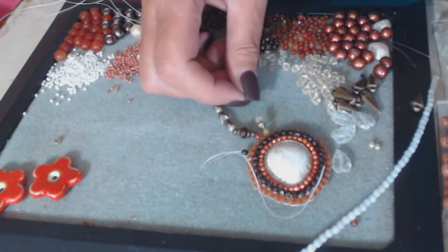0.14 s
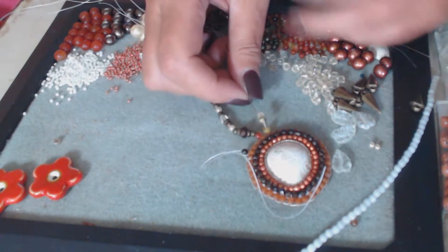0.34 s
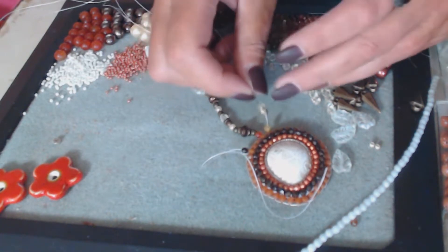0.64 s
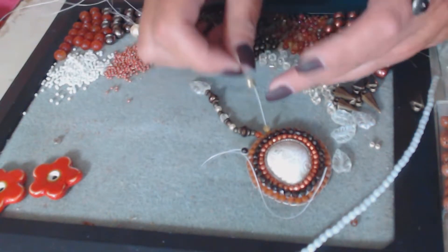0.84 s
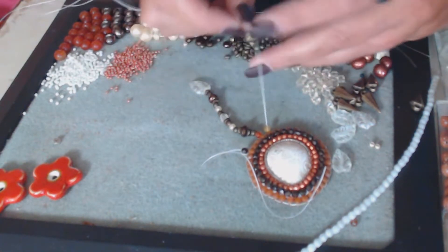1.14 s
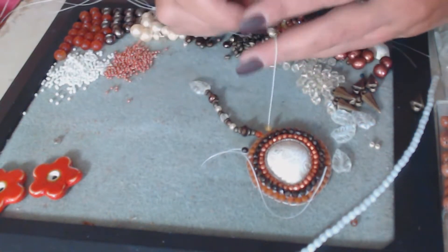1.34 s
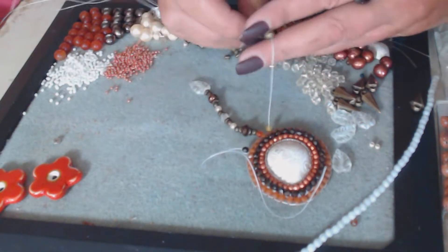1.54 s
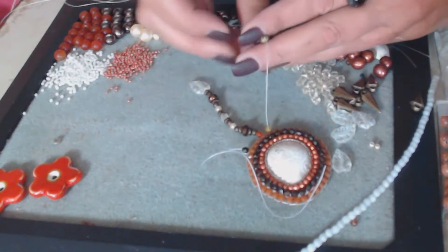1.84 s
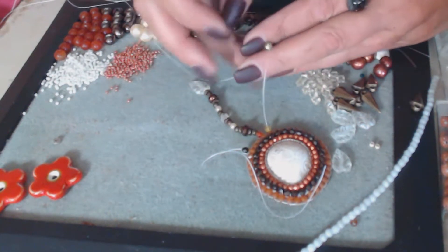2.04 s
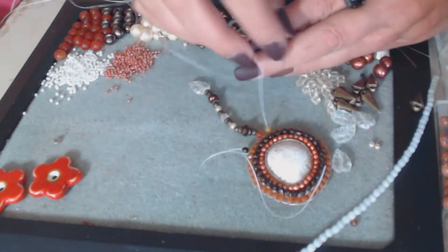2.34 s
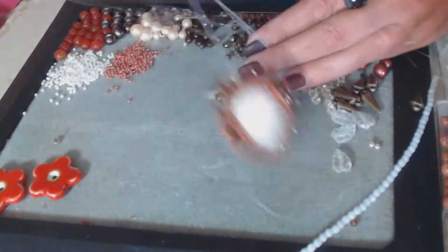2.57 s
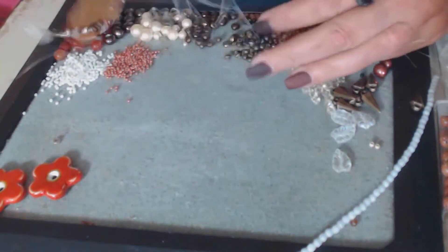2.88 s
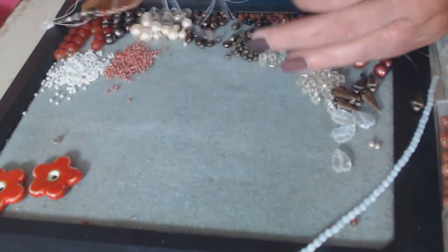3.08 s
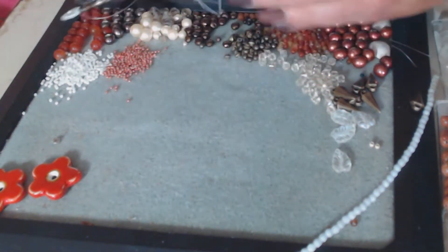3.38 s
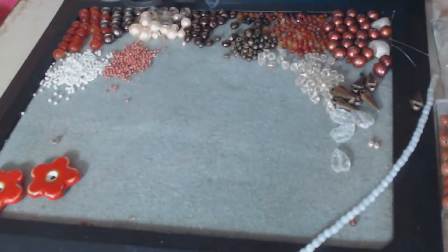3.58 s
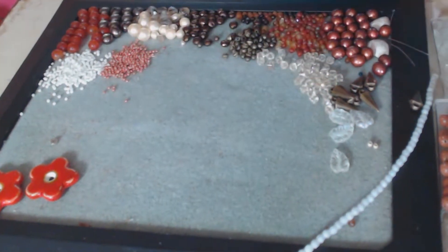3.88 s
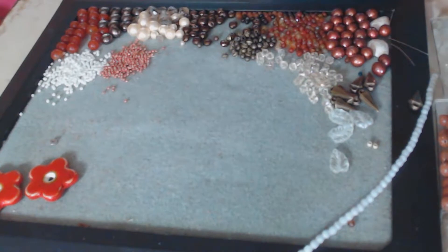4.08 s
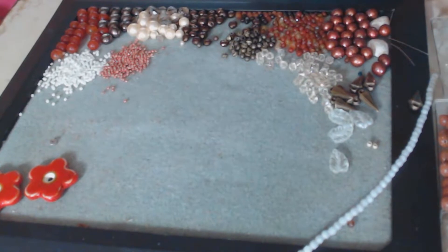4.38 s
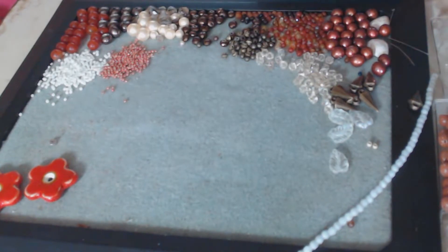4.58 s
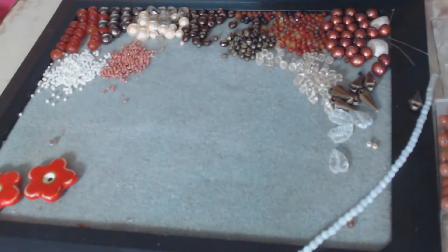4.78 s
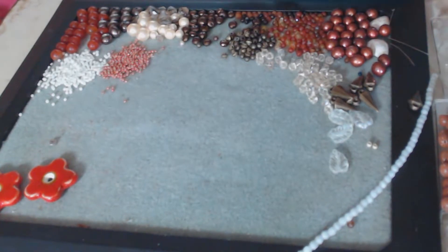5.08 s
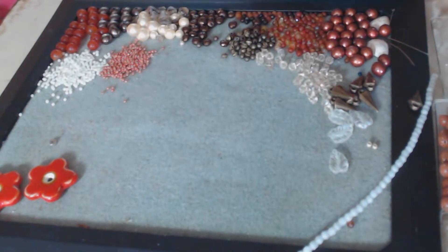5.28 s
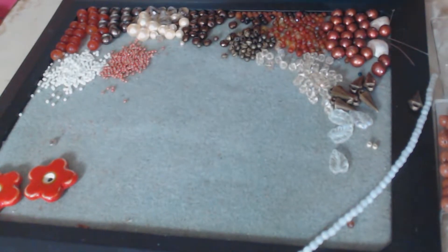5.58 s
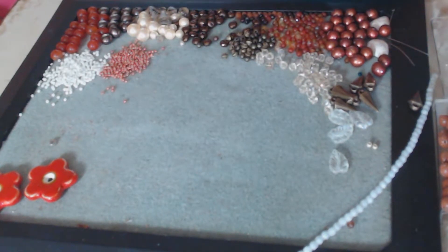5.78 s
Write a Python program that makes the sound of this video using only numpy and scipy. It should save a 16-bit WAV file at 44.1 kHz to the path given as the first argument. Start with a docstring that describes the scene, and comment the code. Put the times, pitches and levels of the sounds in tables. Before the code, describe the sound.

Soft dull thuds over faint fan noise; around three seconds beads tick, knock and scrape for under a second, then near silence again.

```python
"""A quiet room: a beaded pendant on its thread is lifted off a lined tray and handled just beside it.
Beads tick, clatter and knock on the hard tray: chattering noise bursts with rebounds, filtered by colour.
In between they scrape along it: random slips, each a brief decaying note. Struck modes ring on.
Behind them: fan noise with hum lines, soft low bumps and a faint pulsing electronic whine."""
import sys
import numpy as np
from scipy import signal
from scipy.fft import rfft, irfft
from scipy.io import wavfile
from scipy.ndimage import uniform_filter1d, minimum_filter1d

SR = 44100
rng = np.random.default_rng(int(sys.argv[2]) if len(sys.argv) > 2 else 0)


def wrap_up_sound(samples):
    """Save the sound to the file named by the first command line argument, as 16-bit audio."""
    columns = np.atleast_2d(samples).T
    # keep every value between -1 and 1, then stretch to whole-number steps
    tamed = np.clip(columns, -1, 1)
    steps = np.round(tamed * 32767).astype(np.int16)
    wavfile.write(sys.argv[1], SR, steps)


N = 261072
HZ = np.fft.rfftfreq(N, 1 / SR)
TIME = np.arange(N) / SR


def amp(db):
    """Decibels to gain."""
    return 10 ** (np.asarray(db) / 20)


def evened(x):
    """Scales to rms 1."""
    return x / np.sqrt(np.mean(x ** 2) + 1e-20)


def read(points, hz):
    """Interpolates a spectrum table on a log-frequency axis."""
    point_hz, value = np.transpose(points)
    return np.interp(np.log(hz + 1), np.log(point_hz + 1), value)


def add(mix, start_s, sound):
    """Mixes a sound in at start_s."""
    part = mix[round(start_s * SR):][:len(sound)]
    part += sound[:len(part)]


def lowpassed_drift(rate_hz):
    """Slow random curve of rms 1: noise low-passed near rate_hz."""
    return evened(irfft(rfft(rng.standard_normal(N)) / (1 + (HZ / rate_hz) ** 4), N))


def placed(x, balance):
    """Shares a sound between left and right, band by band."""
    left = amp(read(balance, HZ))
    gains = 2 * np.array([left, np.ones_like(left)]) / (1 + left)
    return irfft(rfft(x) * gains, N)


def causal(points, size=2048):
    """Minimum-phase impulse response of a struck body with this colour."""
    log_gain = np.log(amp(read(points, abs(np.fft.fftfreq(size, 1 / SR)))))
    return np.fft.ifft(np.exp(np.conj(signal.hilbert(log_gain)))).real


def pitched(colour, factor):
    """The same colour, moved up or down in pitch."""
    return [(hz * factor, db) for hz, db in colour]


# fan and room air, relative density: freq_hz, level_db_per_hz
AIR_SPECTRUM = [(20, -27.5), (60, -22.5), (110, -1), (160, 1), (225, 3), (320, -8.5), (440, -5.5),
                (790, -12.5), (1300, -19), (2200, -24), (3600, -28), (4300, -31.5), (6200, -34),
                (7400, -38)]
# fan housing resonances: freq_hz, width_hz, lift_db
HOUSING_MODES = [(431, 34.2, 6), (597.5, 69.6, 2.5), (868, 44, 9), (954, 71, 3.5)]


def air(level_db=-58, own_db=-10, flutter_db=-0.5, open_db=0.4, band_hz=2080, band_width_hz=110, band_db=-4):
    """Fan noise coloured by its housing; once the hands are away its hiss opens and a faint band stands out."""
    colour_db = read(AIR_SPECTRUM, HZ)
    for hz, width_hz, lift_db in HOUSING_MODES:
        colour_db = colour_db + lift_db / (1 + (2 * (HZ - hz) / width_hz) ** 2)
    # one noise common to both ears, plus a weaker one of each ear's own
    noise = rng.standard_normal(N) + amp(own_db) * rng.standard_normal((2, N))
    noise = evened(irfft(rfft(noise) * amp(colour_db), N))
    hiss = irfft(rfft(noise) * (1 - 1 / (1 + (HZ / 1800) ** 6)), N)
    band = irfft(rfft(noise) * amp(band_db) * np.exp(-((HZ - band_hz) / band_width_hz) ** 2), N)
    hands_away = np.clip(TIME - 3, 0, 1)
    low = (noise - hiss) * amp(flutter_db * lowpassed_drift(9.2))
    return amp(level_db) * (low + hiss * amp(open_db * hands_away) + band * hands_away)


# mains and motor lines: freq_hz, level_db_rms
HUM_LINES = [(58.2, -69), (120, -73.5), (128.6, -66), (174.4, -61), (240, -71.5), (960, -76.5)]


def hum(waver_rad=.15):
    """Steady sines of the mains and the fan motor, wavering a little in phase."""
    out = np.zeros(N)
    for hz, level_db in HUM_LINES:
        phase = 2 * np.pi * (hz * TIME + rng.random()) + waver_rad * lowpassed_drift(2.2)
        out += amp(level_db) * np.sqrt(2) * np.sin(phase)
    return out


def whine(hz=6810, width_hz=55, level_db=-85.5, sharp=1.5):
    """Thin electronic whine: a wandering narrow-band tone pulsing 24 times a second."""
    pulse = .5 + .5 * np.cos(2 * np.pi * 24 * (TIME - .0185))
    narrow = irfft(rfft(rng.standard_normal(N)) * np.exp(-((HZ - hz) / width_hz) ** 2), N)
    tone = np.cos(np.angle(signal.hilbert(narrow)))  # level flattened, pitch still wanders
    return amp(level_db) * evened(tone * pulse ** sharp)


# clearest soft low bumps: peak_s, level_db, pitch_hz
BUMP_EVENTS = [(0.21, -60.5, 443), (0.526, -52, 240), (0.902, -58, 233), (1.135, -57.5, 458),
               (1.433, -53.5, 236), (2.445, -51, 257), (4.331, -54, 427), (4.962, -53, 382),
               (5.205, -53, 251), (5.52, -51.5, 236)]
# thud colour, also under bead contacts: freq_hz, level_db
THUD_COLOUR = [(40, -31), (120, -19), (200, -2), (330, 4.5), (600, 1), (780, -11.5), (1150, -40.5),
               (3000, -70)]
FAINT_BUMP_DB, FAINT_BUMP_HZ = -60, 240


def bumps(rise_s=.011, murk=0.4, faint_count=8):
    """Soft, dull bumps, some faint at random times: a low tone and thud noise that swell and die."""
    t, out = np.arange(SR // 8) / SR, np.zeros(N)
    swell = t / rise_s * np.exp(1 - t / rise_s)
    faint = [(s, FAINT_BUMP_DB, FAINT_BUMP_HZ) for s in rng.uniform(rise_s, N / SR, faint_count)]
    for peak_s, level_db, hz in [*BUMP_EVENTS, *faint]:
        noise = rng.standard_normal(2 * len(t))
        thud = evened(signal.fftconvolve(noise, causal(THUD_COLOUR))[len(t):2 * len(t)])
        body = evened(np.sin(2 * np.pi * hz * t) + murk * thud)
        add(out, peak_s - rise_s, amp(level_db) * swell * body)
    return out


def squeak(peak_s=4.228, length_s=0.032, hz=2580, width_hz=190, level_db=-66):
    """One faint rubbing squeak: narrow-band noise that swells and fades."""
    rub = evened(irfft(rfft(rng.standard_normal(N)) / (1 + ((HZ - hz) / width_hz) ** 2), N))
    return amp(level_db) * rub * np.exp(-((TIME - peak_s) / length_s) ** 2)


def slips(per_s=1600, spread_db=3.0, cycles=3.5, count=24):
    """Beads catch and slip at random, each with a brief note of its own."""
    t, out = np.arange(1024) / SR, np.zeros(N)
    size = amp(spread_db * np.minimum(rng.exponential(1, N), 3)) * rng.choice([-1, 1], N)
    train = size * (rng.random(N) < per_s / SR)
    bead = rng.integers(0, count, N)
    for k, hz in enumerate(np.geomspace(800, 7000, count)):
        note = np.cos(2 * np.pi * hz * t) * np.exp(-t * hz / cycles)
        note *= np.sqrt(hz / 2500) / np.linalg.norm(note)
        note[0] += .5  # snap of the slip itself
        out += signal.oaconvolve(train * (bead == k), note)[:N]
    return out


# colours of tray clack, bead tick (both also in contacts) and light beads sliding: freq_hz, level_db
CLACK_COLOUR = [(150, -54.5), (480, -25.5), (740, -7), (900, 3.5), (1300, 0.5), (1950, 2), (2700, 0),
                (3300, -9.5), (4000, -25), (6000, -50), (12000, -69.5)]
TICK_COLOUR = [(600, -53.5), (1800, -29), (2800, -14.5), (3500, -4), (4000, -6.5), (4650, 2), (5300, 1),
               (5800, -2.5), (6500, -4), (7600, -2.5), (8400, -8)]
SLIDE_COLOUR = [(400, -53), (1150, -26.5), (1600, -6.5), (2150, -2), (2600, -2), (3050, -9), (3800, -16),
                (5000, -24), (9000, -56.5)]
# short drags, levels before trim_db: start_s, length_s, scrape_db, rattle_db, light_bead_share_0_to_1
DRAG_STROKES = [(2.792, 0.05, -76, -58.5, .5), (3.015, .18, -27, -35, 0.25),
                (3.159, 0.072, -34.5, -47, 0.2), (3.222, 0.098, -41, -55, 0.24),
                (3.431, .12, -50.5, -40, .2), (3.467, .015, -40, -15.5, 0), (3.553, 0.13, -51, -63.5, 0.3),
                (3.682, 0.087, -43.5, -47, 0.4), (3.743, 0.099, -41, -49, 0.84),
                (4.11, 0.04, -83, -71.5, .5), (5.132, 0.045, -75, -63, 0.52)]
STROKE_SKEW, STROKE_POWER = .7, 1.8  # speeds up quickly, slows down gently


def drag(trim_db=-2):
    """Each stroke swells and fades; its slips sound through the tray and the beads themselves."""
    grains, out = slips(), np.zeros(N)
    heavy, small, rattle = (evened(signal.oaconvolve(grains, causal(colour))[:N])
                            for colour in (CLACK_COLOUR, SLIDE_COLOUR, TICK_COLOUR))
    for start_s, length_s, scrape_db, rattle_db, light in DRAG_STROKES:
        now = (TIME >= start_s) & (TIME < start_s + length_s)
        progress = (TIME[now] - start_s) / length_s
        speed = abs(np.sin(np.pi * progress ** STROKE_SKEW)) ** STROKE_POWER
        scrape = np.sqrt(1 - light) * heavy[now] + np.sqrt(light) * small[now]
        out[now] += speed * (amp(scrape_db) * scrape + amp(rattle_db) * rattle[now])
    return amp(trim_db) * out


def chatter(die_s, size=2048):
    """A burst of micro-bounces, partly evened in colour, that dies away."""
    fade = np.exp(-np.arange(size) / SR / die_s)
    burst = rng.standard_normal(size) * fade
    # the shorter the contact, the nearer to one clean pulse
    burst[0] += 4 * np.exp(-die_s / 0.0014) * np.linalg.norm(burst)
    spectrum = rfft(burst)
    return irfft(spectrum / (abs(spectrum) + 1e-9) ** 0.19) * np.sqrt(fade)


REBOUND_S, REBOUND_DB, REBOUND_SHRINK = .008, -17, .65  # first mean gap, level step, gap ratio


def bouncing(die_s, count=2):
    """A contact and its rebounds, each weaker and tending to come sooner."""
    out, at_s, gap_s = np.zeros(SR // 8), 0, REBOUND_S
    for k in range(count + 1):
        burst = chatter(die_s)
        add(out, at_s, amp(k * REBOUND_DB) * burst / np.linalg.norm(burst))
        at_s += gap_s * rng.uniform(.8, 1.2)
        gap_s *= REBOUND_SHRINK
    return out


# clearest bead contacts (tray, bead on bead, support): start_s, clack_db, tick_db, thud_db, pitch_factor
BEAD_CONTACTS = [(0.856, -80, -66.5, -78, 1.6), (2.8246, -88.5, -31, -63.5, 1.57),
                 (3.039, -23.5, -46, -49.5, 0.81), (3.044, -26.5, -37, -48.5, 1.18),
                 (3.0757, -16.5, -16.5, -17.5, 0.96), (3.0773, -15, -21.5, -29, 0.92),
                 (3.1119, -28.5, -30, -56, 1.06), (3.1257, -27, -42, -58.5, 1.38),
                 (3.1741, -31.5, -38, -55.5, 1.27), (3.1766, -30, -37.5, -66, 1.27),
                 (3.2518, -33.5, -29.5, -71, 1.03), (3.334, -35.5, -80, -48, 0.41),
                 (3.344, -41, -79, -41.5, 0.41), (3.4717, -17.5, -16, -27.5, 0.92),
                 (3.475, -32, -24, -52, 1.02), (3.612, -39.5, -50, -51, 0.85),
                 (3.62, -49, -64, -52.5, 0.85), (3.7016, -34, -27.5, -50, 1.2),
                 (3.705, -29, -48, -69, 1.14), (3.7159, -36.5, -45, -60, 1.3),
                 (3.7208, -34.5, -31, -62, 1.28), (3.7585, -41, -45, -62, 1.34),
                 (3.788, -39.5, -44, -60, 1.18), (3.8277, -23.5, -54, -43.5, .82),
                 (3.8495, -28, -51, -47, 0.8)]
CONTACT_S, SOFTNESS_PER_DB, SHORTEST_S = .0016, -0.0044, .0009  # more clack than tick: shorter chatter
TICK_FOLLOW = .75  # exponent: how closely tick pitch follows clack pitch


def contacts():
    """Each contact is a few ms of chatter and two rebounds, heard as thud, clack and tick."""
    out = np.zeros(N)
    span = .004 * SR  # samples over which the levels are rms
    for start_s, clack_db, tick_db, thud_db, pitch in BEAD_CONTACTS:
        die_s = max(CONTACT_S * np.exp(SOFTNESS_PER_DB * (clack_db - tick_db)), SHORTEST_S)
        burst = bouncing(die_s)
        layers = ((THUD_COLOUR, 1, thud_db), (CLACK_COLOUR, pitch, clack_db),
                  (TICK_COLOUR, pitch ** TICK_FOLLOW, tick_db))
        for colour, factor, level_db in layers:
            blow = signal.fftconvolve(burst, causal(pitched(colour, factor)))
            add(out, start_s, amp(level_db) * np.sqrt(span) * blow / np.linalg.norm(blow))
    return out


# modes of beadwork and tray, relative levels: freq_hz, level_db, t60_s
RING_MODES = [(144.2, 9, 0.16), (889, -6, 0.041), (1114, -12.5, 0.053), (1514.6, -5.5, 0.063),
              (1960, -3, .08), (2734, -19.5, 0.073), (3480, -7, 0.065), (3750, -4.5, .07),
              (4387, -12.5, 0.05), (4900, -15, .04), (5684, -12.5, 0.044), (5850, -11.5, 0.066),
              (7060, 0.5, 0.071), (7280, -13, .04)]


def ring(x, ring_db=-17):
    """Every blow sets the same decaying modes ringing."""
    t = np.arange(SR // 3) / SR
    modes = sum(amp(db - 60 * t / t60_s) * np.sin(2 * np.pi * hz * t) for hz, db, t60_s in RING_MODES)
    return signal.oaconvolve(x, modes * amp(ring_db) / np.linalg.norm(modes))[:N]


# how unlike the two ears hear the beads: freq_hz, side_db
EAR_WIDTH = [(150, -14), (500, -7), (1000, -7), (2000, -21), (5000, -24)]


def tabletop(x, delay_s=0.00046, die_s=0.0033):
    """Reflections from the table and hands, opposite in sign at the two ears."""
    bounce = np.zeros(SR // 10)
    add(bounce, delay_s, chatter(die_s))
    side = signal.oaconvolve(x, bounce / np.linalg.norm(bounce))[:N]
    return np.array([[1], [-1]]) * signal.oaconvolve(side, causal(EAR_WIDTH))[:N]


# room decay: freq_hz, t60_s
ROOM_DECAY = [(150, 0.122), (450, 0.049), (900, 0.13), (2500, 0.11), (5000, 0.11), (8000, 0.062)]


def room(x, wet_db=-11, apart=0.1464):
    """A small furnished room: sparse reflections, nearly alike at both ears."""
    t = np.arange(SR // 2) / SR
    taps = rng.choice([-1, 1], (2, len(t))) * (rng.random((2, len(t))) < 3000 / SR) * (t > .003)
    hz, at_s, bins = signal.stft(taps, SR, nperseg=256)
    decay = amp(-60 * at_s / read(ROOM_DECAY, hz)[:, None])
    tails = signal.istft(bins * decay, SR, nperseg=256)[1]
    mid, side = signal.fftconvolve(x[None], tails / np.linalg.norm(tails[0]), axes=1)[:, :N]
    return amp(wet_db) * np.array([mid + apart * side, mid - apart * side])


# background and bead balance: freq_hz, left_minus_right_db
AIR_BALANCE = [(60, 9.5), (180, 12), (540, 8.5), (930, 8), (1600, 1), (4000, 1.5)]
BEAD_BALANCE = [(150, -2), (400, 2.5), (1200, 1.5), (2500, -0.5), (5000, 0.96)]


def scene():
    """Beads in front, the fan and other background off to the left."""
    background = placed(air() + hum() + whine() + bumps(), AIR_BALANCE)
    beads = squeak() + drag() + contacts()
    beads = beads + ring(beads)
    near = placed(beads + tabletop(beads) + room(beads), BEAD_BALANCE)
    return background + near


EDGE_HZ, TOP_HZ = 7740, 15700  # low-pass before and after the limiter


def record(dry, ceiling=.7):
    """A narrow-band microphone; a quick limiter holds the hardest knocks and makes them spit a little."""
    edge = signal.firwin(201, EDGE_HZ, window=("kaiser", 7), fs=SR)
    heard = signal.oaconvolve(dry, edge[None], "same")
    gain = ceiling / np.maximum(abs(heard).max(0), ceiling)
    gain = uniform_filter1d(minimum_filter1d(gain, size=15), size=15)
    top = signal.firwin(201, TOP_HZ, window=("kaiser", 7), fs=SR)
    return signal.oaconvolve(heard * gain, top[None], "same")


dry = scene()
out = record(dry)
wrap_up_sound(out)
```